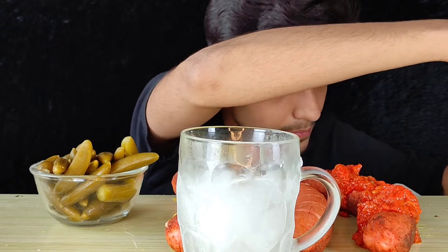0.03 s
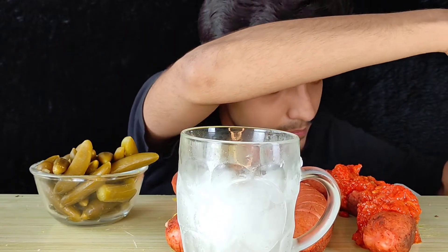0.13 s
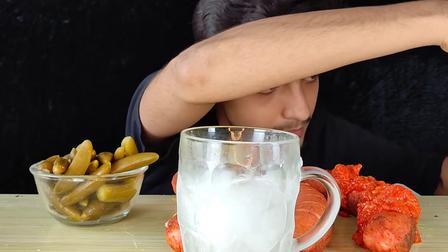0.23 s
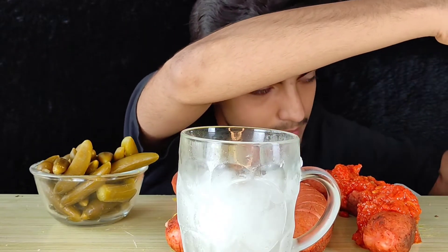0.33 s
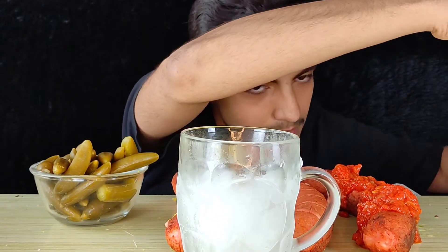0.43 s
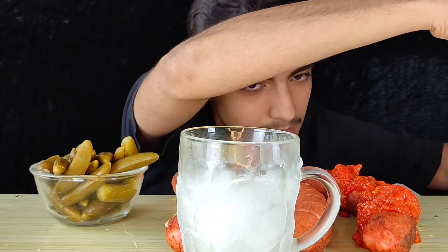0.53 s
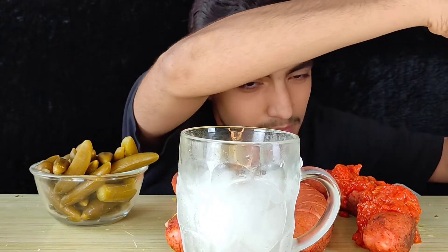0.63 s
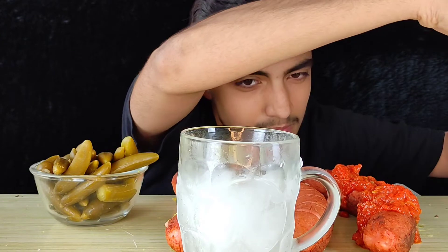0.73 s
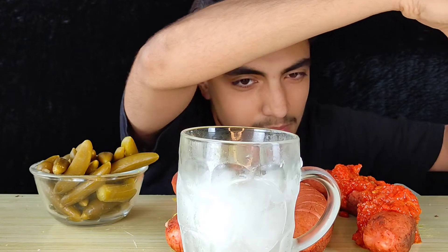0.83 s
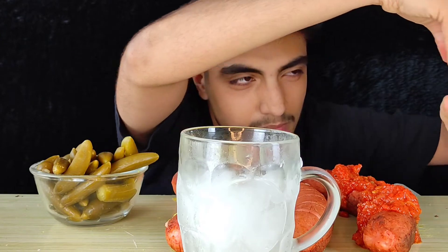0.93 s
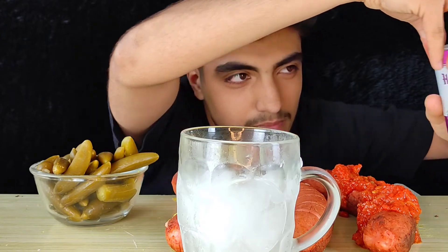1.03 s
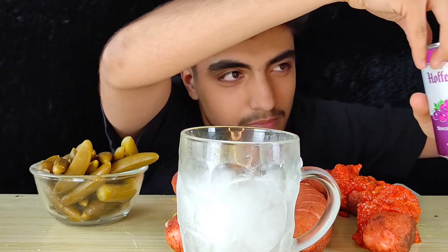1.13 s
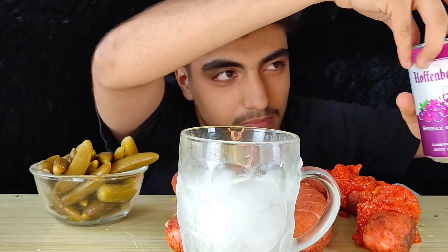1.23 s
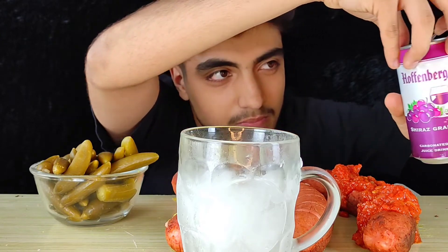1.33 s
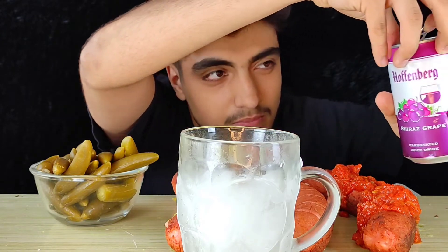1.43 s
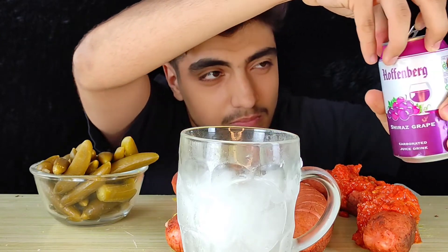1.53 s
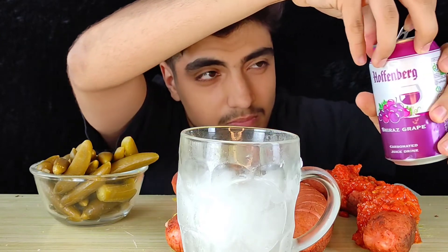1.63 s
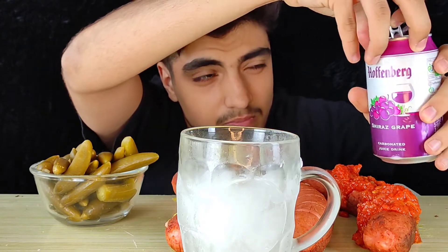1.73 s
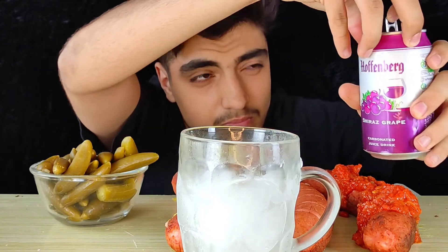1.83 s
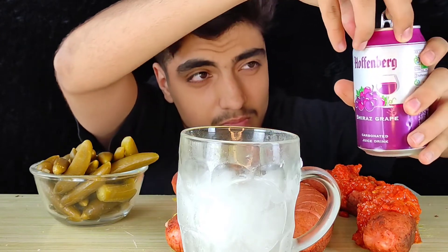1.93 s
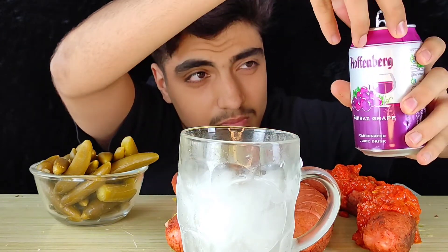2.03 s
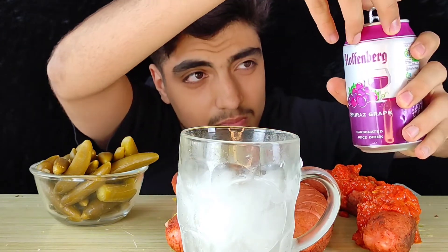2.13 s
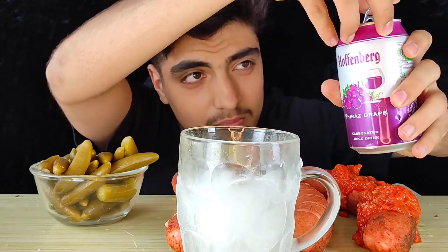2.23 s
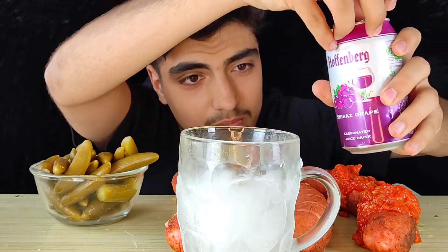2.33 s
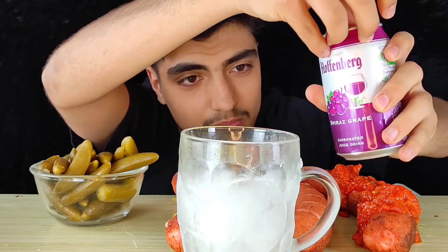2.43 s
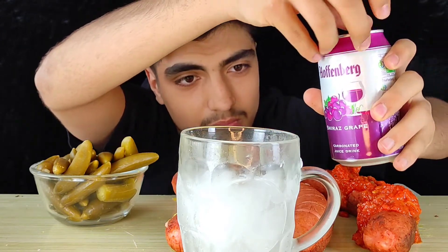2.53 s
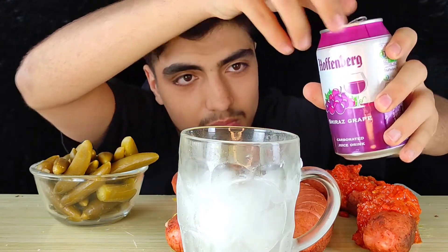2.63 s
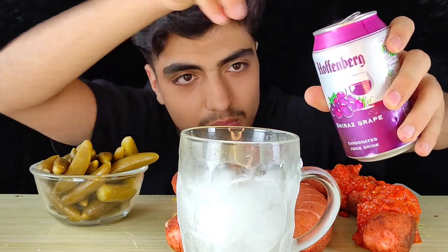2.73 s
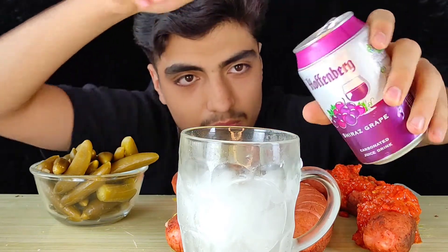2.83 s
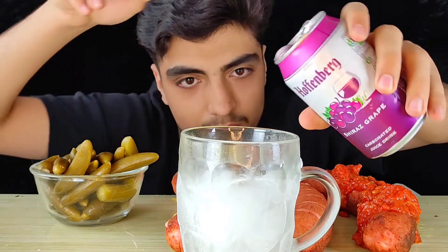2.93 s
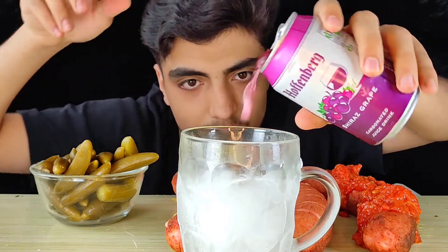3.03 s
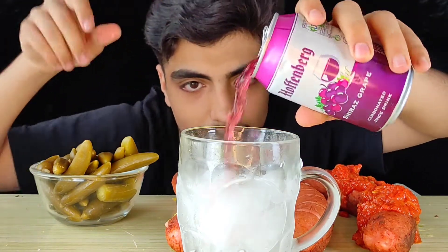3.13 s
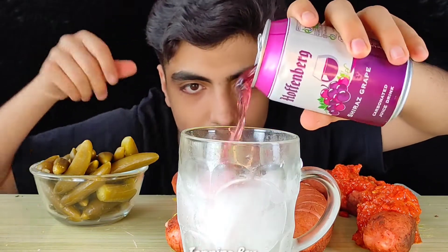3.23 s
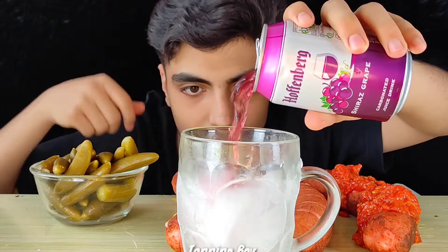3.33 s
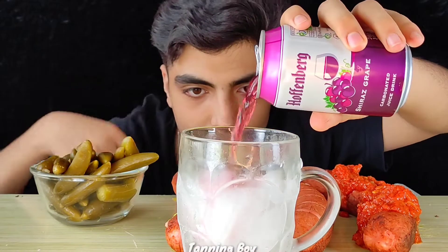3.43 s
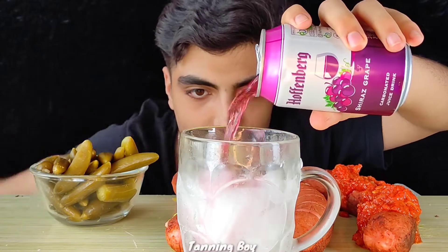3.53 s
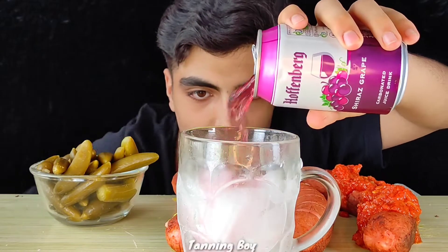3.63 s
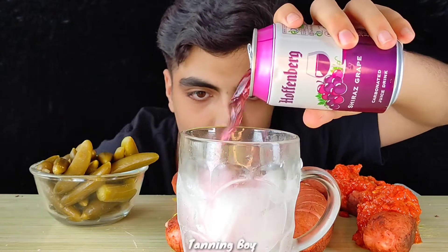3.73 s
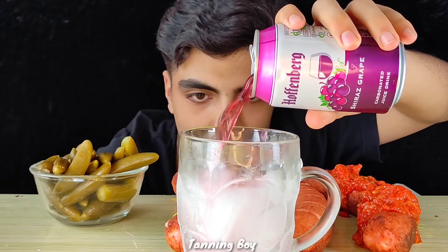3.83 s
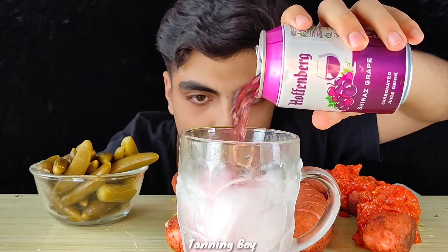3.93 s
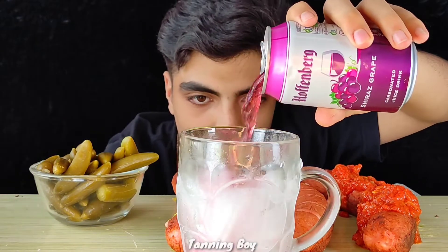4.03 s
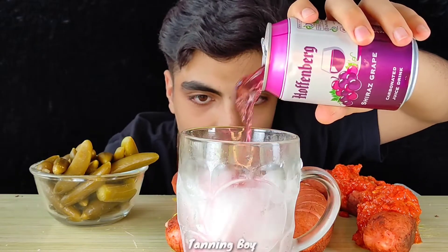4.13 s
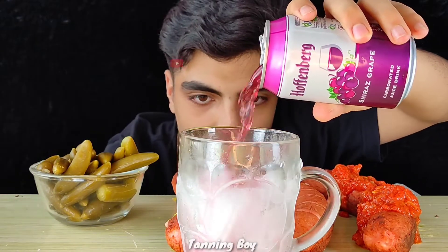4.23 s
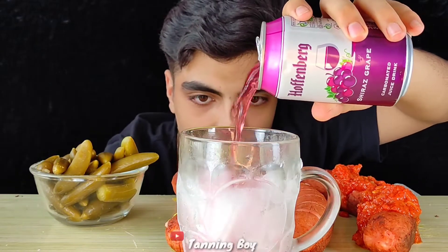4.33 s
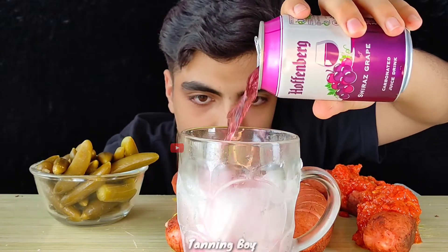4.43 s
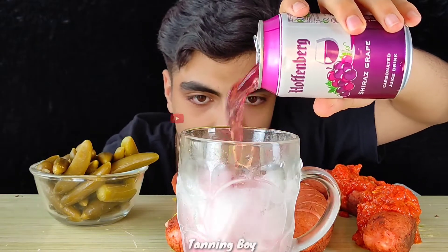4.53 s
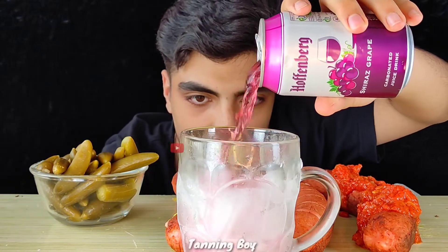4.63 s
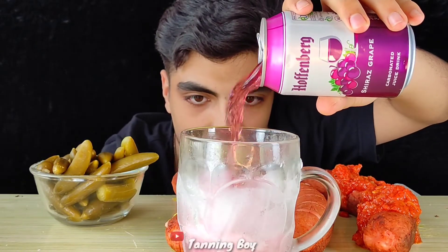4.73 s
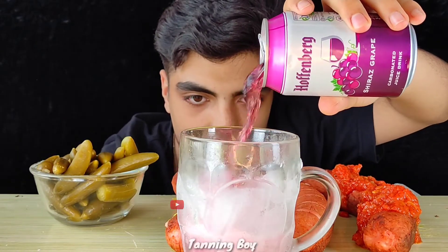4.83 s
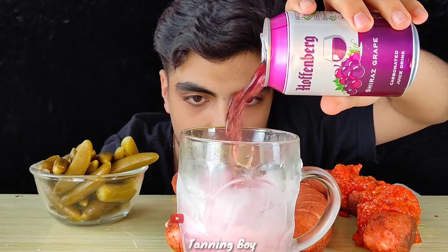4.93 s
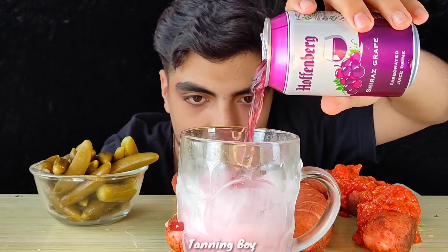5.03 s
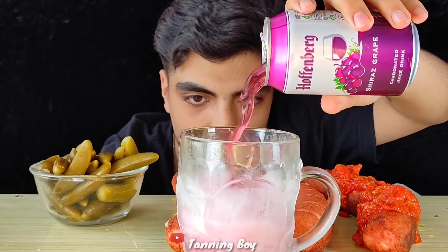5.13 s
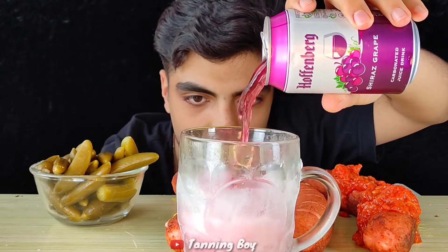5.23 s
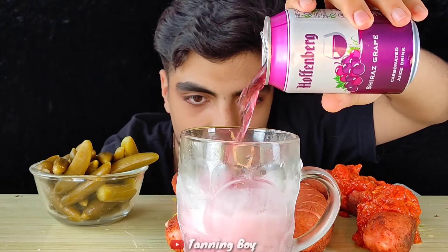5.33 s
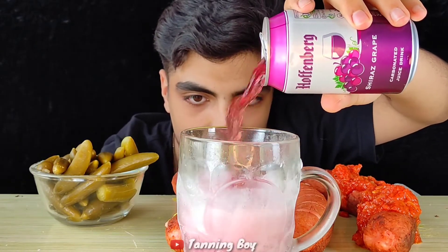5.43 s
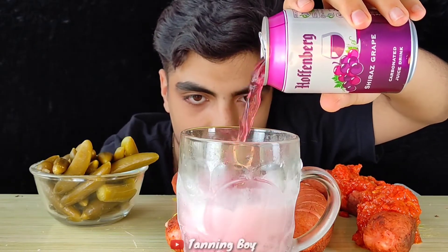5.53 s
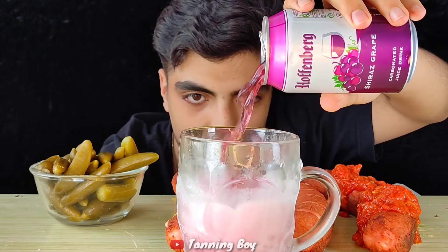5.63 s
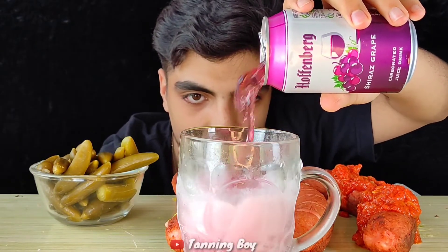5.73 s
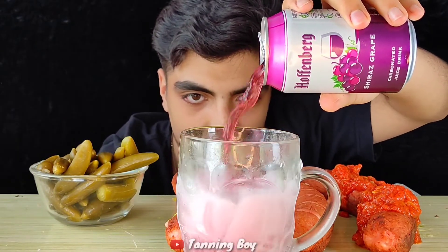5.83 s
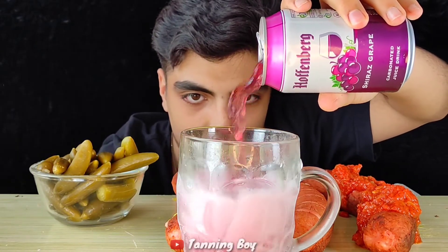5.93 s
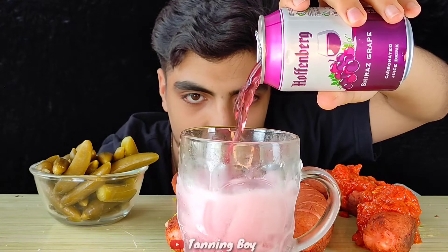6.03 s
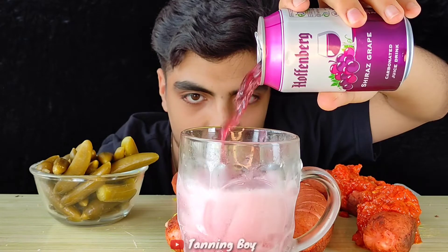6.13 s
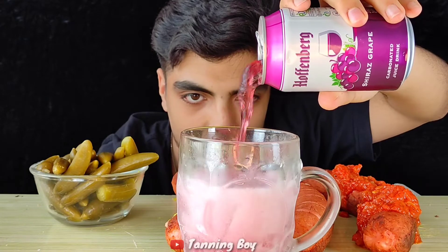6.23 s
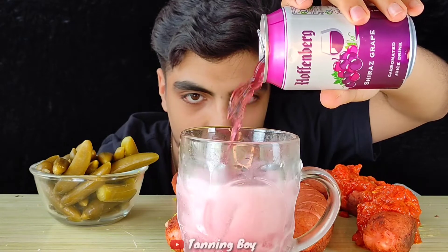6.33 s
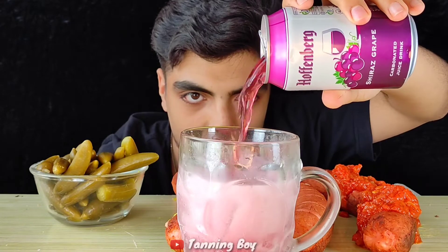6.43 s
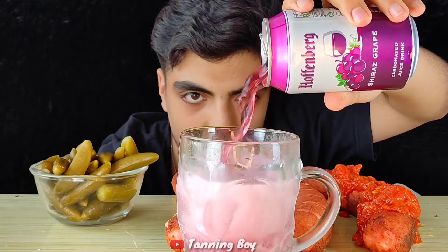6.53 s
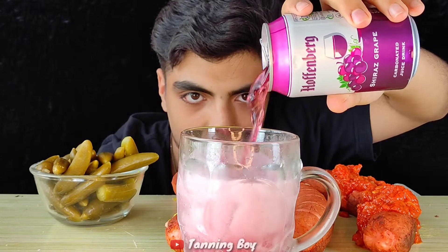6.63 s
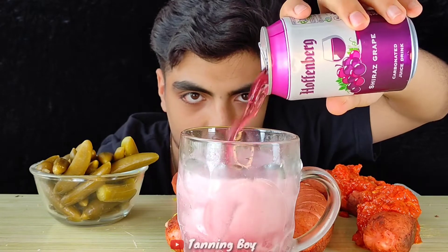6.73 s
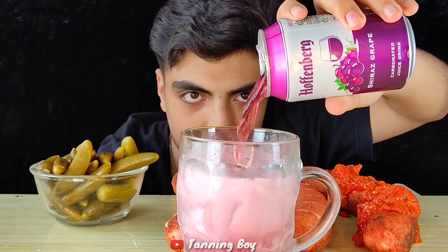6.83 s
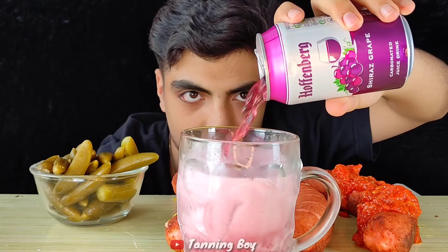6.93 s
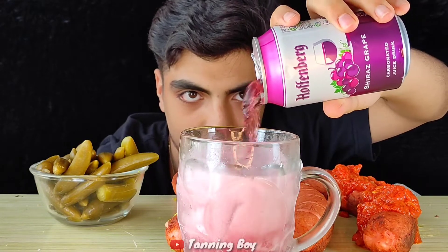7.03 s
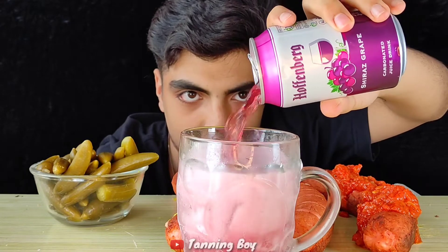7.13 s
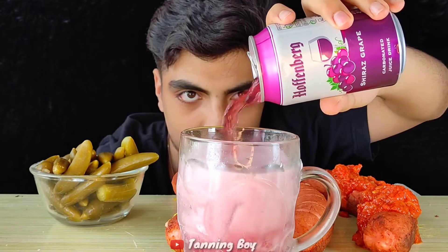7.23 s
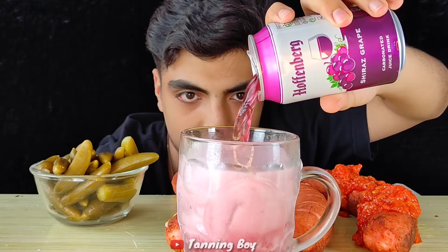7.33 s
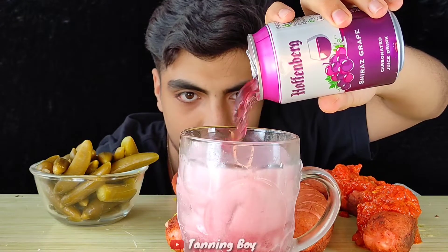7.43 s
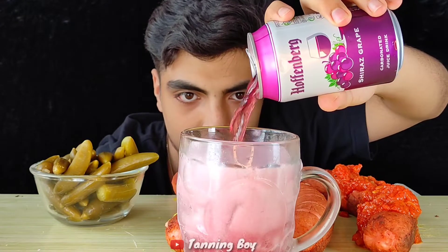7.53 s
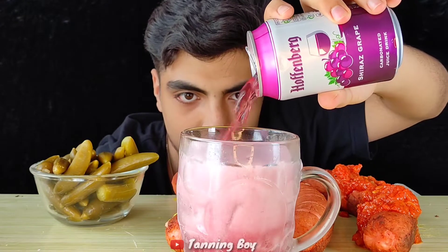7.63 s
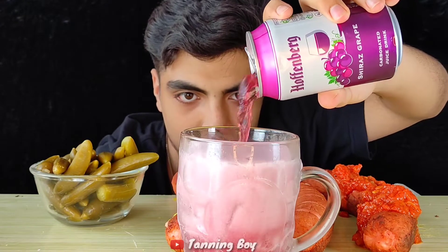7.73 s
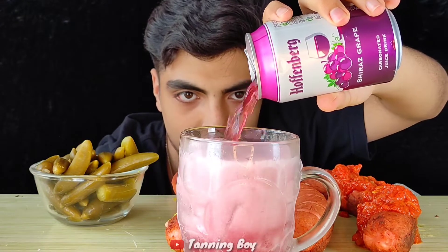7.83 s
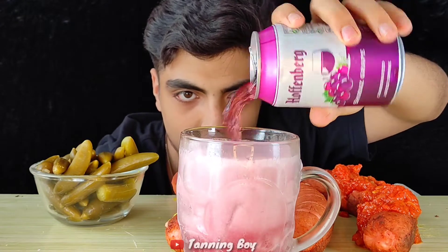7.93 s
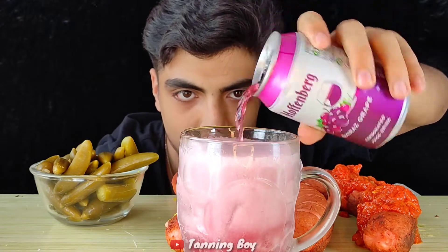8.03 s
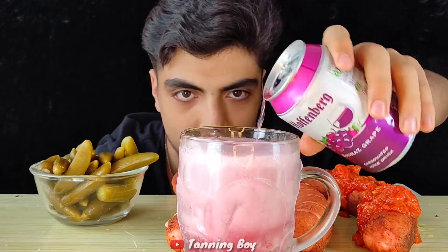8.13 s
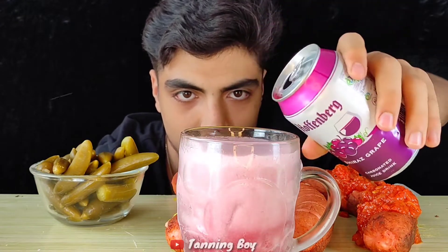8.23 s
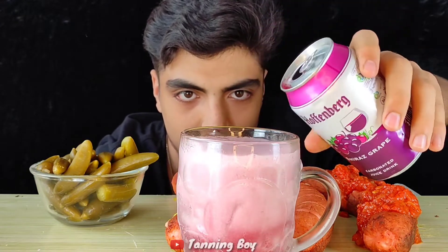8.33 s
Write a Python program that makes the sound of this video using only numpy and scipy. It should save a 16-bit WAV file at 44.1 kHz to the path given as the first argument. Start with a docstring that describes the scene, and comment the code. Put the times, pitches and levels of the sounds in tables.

```python
"""A small room: a can of fizzy drink is opened close to a microphone and poured over ice in a glass mug.
Gas, tab and lid are shaped noise and bursts: gas spits out, the tab snaps, the lid tears.
The pour sums damped bubble tones, a resonance in the shrinking air space and fizzing foam.
The ice cracks and bumps as coloured bursts; decaying modes make its knock and its clinks on the glass."""
import sys
import numpy as np
from scipy import signal
from scipy.fft import rfft, irfft, next_fast_len
from scipy.io import wavfile
from scipy.ndimage import map_coordinates

SR = 44100
rng = np.random.default_rng(int(sys.argv[2]) if len(sys.argv) > 2 else 0)


def transcribe(u):
    """Save the signal u as a 16-bit wav file named by the first command-line argument.

    u: samples, shape (n,) or (channels, n), limited to [-1, 1]; the rate is SR.
    q: integer samples, one column per channel.
    """
    v = np.clip(np.atleast_2d(u).T, -1, 1)
    q = np.round(v * 32767).astype(np.int16)
    wavfile.write(sys.argv[1], SR, q)


N = 369425
TIME_S = np.arange(N) / SR
HIT_S = np.arange(SR // 2) / SR  # time axis of one short sound


def amp(db):
    """Decibels to gain."""
    return 10 ** (np.asarray(db) / 20)


def unit(x):
    """Scale to rms 1."""
    return x / np.sqrt(np.mean(x ** 2) + 1e-20)


def along(points, hz):
    """(Hz, value) points read on a log frequency axis."""
    point_hz, value = np.transpose(points)
    return np.interp(np.log(hz + 1), np.log(point_hz), value)


def curves(rows):
    """One value per sample for each column after the time."""
    s, *columns = np.transpose(rows)
    return [np.interp(TIME_S, s, column) for column in columns]


def wobble(knots_per_s):
    """Smooth random curve through normally distributed knots."""
    knots = rng.standard_normal(int(N * knots_per_s / SR) + 4)
    return map_coordinates(knots, [TIME_S * knots_per_s])


def colour(x, spectrum, size=4096):
    """Causal minimum-phase filter with the given (Hz, dB) shape, by folding the cepstrum."""
    log_gain = np.log(amp(along(spectrum, np.fft.rfftfreq(size, 1 / SR))))
    cepstrum = irfft(log_gain)
    cepstrum[1:size // 2] *= 2
    cepstrum[size // 2 + 1:] = 0
    impulse = irfft(np.exp(rfft(cepstrum)))
    return signal.fftconvolve(x, impulse)[:len(x)]


def noise(spectrum):
    """Coloured noise of rms 1."""
    return unit(colour(rng.standard_normal(N), spectrum))


def fade(t, t60):
    """Free decay, 60 dB in t60."""
    return np.exp(-np.log(1000) * t / t60)


def add(track, s, db, sound):
    """Place a sound at time s with its peak at db."""
    part = track[round(s * SR):][:len(sound)]
    part += amp(db) * sound[:len(part)] / np.abs(sound).max()


# Room decay. Each row: frequency in Hz, t60 in s.
ROOM_DECAY = [(150, 0.75), (1000, 0.41), (4000, 0.32), (8000, 0.23), (15000, 0.15)]


def room(x, wet_db):
    """The sound plus a diffuse tail whose treble dies first."""
    hz, t, z = signal.stft(rng.standard_normal(len(HIT_S)), SR, nperseg=256)
    decay = fade(t, along(ROOM_DECAY, hz)[:, None])
    tail = signal.istft(z * decay, SR, nperseg=256)[1]
    tail = np.pad(tail, (SR // 150, 0)) / np.linalg.norm(tail)  # starts 1/150 s late
    return x + amp(wet_db) * signal.fftconvolve(x, tail)[:N]


def clicks(rows, spectrum, t60):
    """Short bursts coloured by the body that snaps."""
    out = np.zeros(N)
    for s, db in rows:
        burst = rng.standard_normal(len(HIT_S)) * fade(HIT_S, t60)
        add(out, s, db, colour(burst, spectrum))
    return out


def ring(modes, scatter_db):
    """One blow on a set of modes, each at a new strength."""
    out = np.zeros(len(HIT_S))
    for hz, db, t60 in modes:
        strength = amp(db + scatter_db * rng.standard_normal())
        out += strength * fade(HIT_S, t60) * np.sin(2 * np.pi * hz * HIT_S)
    return out


def chirps(start, hz, strength, cycles, rise, size):
    """Damped bubble tones from the given samples, t60 in cycles, each rising as it nears the surface."""
    turns = np.minimum(hz, SR / 2)[:, None] * np.arange(size) / SR
    age = np.minimum(turns / cycles, 1)
    tones = strength[:, None] * fade(turns, cycles) * np.sin(2 * np.pi * turns * (1 + rise * age))
    where = start[:, None] + np.arange(size)
    return np.bincount(where.ravel(), tones.ravel(), N)[:N]


def bubbles(per_s, hz, spread_oct, cycles, size_db, rise, drift_oct, size):
    """A steady cloud of bubbles with random times, pitches and strengths; rms 1."""
    start, pitch, strength = rng.random((int(per_s * N / SR), 3)).T
    start = (start * N).astype(int)
    swarm_oct = drift_oct * wobble(20)[start]  # bubbles born together are alike in size
    strength = amp(size_db * np.minimum(-np.log(1 - strength), 4))
    bubble_hz = hz * 2 ** (swarm_oct + spread_oct * (2 * pitch - 1))
    return unit(chirps(start, bubble_hz, strength, cycles, rise, size))


# Room noise level before its wobble. Each row: time in s, rms in dB.
RUMBLE_LEVEL = [(0, -34), (.5, -39), (2.5, -41), (3.3, -37), (8.3, -36.5)]
# Room noise spectrum. Each row: frequency in Hz, relative level in dB.
RUMBLE_SPECTRUM = [(20, -3), (45, -5.5), (120, -4.5), (260, -15), (430, -22), (1000, -29.5), (1800, -38.5),
                   (8000, -69.5)]
# Low drone before its wobble. Each row: frequency in Hz, amplitude in dB.
DRONE_TONES = [(72, -39), (192, -45), (335, -50.5)]


def background():
    """Low room rumble and a faint hiss, with a wavering drone that dies away."""
    rumble_db = curves(RUMBLE_LEVEL)[0] + 1.1 * wobble(18.0)
    rumble = amp(rumble_db) * noise(RUMBLE_SPECTRUM)
    hiss = amp(-55.5) * noise([(4000, 0.0), (14000, -4.5)])
    drone = np.zeros(N)
    for hz, db in DRONE_TONES:
        level = amp(db + 3.5 * wobble(3.5))
        drone += level * np.sin(2 * np.pi * hz * TIME_S + wobble(7.0))
    return rumble + hiss + drone * np.interp(TIME_S, [2.1, 2.5], [1, 0])


# Ice pile dropping on the bottom. Each row: start in s, peak in dB.
KNOCK_HITS = [(5.484, -8.5), (5.569, -3.5), (5.589, -27)]
# Modes of the mug on the table top. Each row: frequency in Hz, relative level in dB, t60 in s.
TABLE_MODES = [(126, -8.5, 0.28), (163.2, -3.5, 0.31), (232, -1, 0.16), (292, 8, 0.028), (437, -2, 0.045)]


def knocks():
    """Ice falls on the bottom and rings the low modes of mug and table."""
    out = np.zeros(N)
    for s, db in KNOCK_HITS:
        add(out, s, db, ring(TABLE_MODES, scatter_db=0.5))
    return room(out, wet_db=-5.5)


# Ice splitting in the drink. Each row: start in s, peak in dB.
CRACK_HITS = [(3.576, -12), (4.133, -25), (4.566, -22.5), (4.785, -23.5), (4.903, -23), (5.129, -10.5)]
# Crack spectrum. Each row: frequency in Hz, relative level in dB.
CRACK_SPECTRUM = [(200, 6), (730, -7), (2560, 6), (4500, -10), (10000, -6), (15500, -17.5)]
# Submerged ice bumping the wall. Each row: start in s, peak in dB.
BUMP_HITS = [(5.569, -4.5), (5.843, -23.5), (6.033, -21.5), (6.487, -22.5), (6.746, -24.5), (6.785, -18),
             (6.793, -15.5), (6.906, -13), (6.94, -18), (7.051, -23), (7.132, -18.5), (7.211, -21.5),
             (7.338, -19), (7.426, -16.5), (7.533, -22.5), (7.601, -28), (7.71, -24), (7.825, -27),
             (7.908, -26.5)]
# Bump spectrum. Each row: frequency in Hz, relative level in dB.
BUMP_SPECTRUM = [(100, 3.5), (280, 6), (750, 0.5), (1300, -1), (2400, -4.5), (3500, -18), (14000, -28.5)]


def ice():
    """Cubes split, then bump about afloat: short coloured bursts."""
    cracks = clicks(CRACK_HITS, CRACK_SPECTRUM, t60=0.011)
    bumps = clicks(BUMP_HITS, BUMP_SPECTRUM, t60=0.0087)
    return room(cracks + bumps, wet_db=-4.5)


# Ice striking bare glass. Each row: start in s, peak in dB, main mode in Hz, second mode in Hz.
CLINK_HITS = [(5.485, 1, 10340, 4210), (5.57, -8, 7020, 9080), (5.599, -10.5, 4870, 2030),
              (6.489, -18, 9080, 5600), (6.908, -12.5, 7020, 5600), (6.94, -22, 5600, 9080),
              (7.058, -23, 5600, 7020), (7.133, -30, 9080, 7020), (7.177, -29.5, 5600, 2030),
              (7.34, -17.5, 4870, 2030), (7.71, -27.5, 2030, 4870)]
# Modes of the mug, before strike and damping. Each row: frequency in Hz, relative level in dB, t60 in s.
GLASS_MODES = [(2015, 4.5, 0.052), (4217, -4.5, 0.17), (4870, 2, 0.054), (5590, -6.5, 0.11),
               (7036, -6, 0.16), (9080, 4.5, 0.03), (9600, -0.5, 0.15), (10270, 5, 0.1), (12220, -7, 0.1),
               (14200, -3.5, 0.14)]
SECOND_DB, OTHERS_DB = -5.5, -15.5  # drive of the second mode and the rest, against the main one


def clinks():
    """The spot where the ice strikes picks out two modes of the glass; the others ring faintly."""
    out = np.zeros(N)
    hz, level_db, t60 = np.transpose(GLASS_MODES)
    for s, db, main_hz, second_hz in CLINK_HITS:
        drive_db = np.full(len(hz), OTHERS_DB)
        drive_db[np.argmin(np.abs(hz - second_hz))] = SECOND_DB
        drive_db[np.argmin(np.abs(hz - main_hz))] = 0
        contact = .5 * rng.standard_normal(len(HIT_S)) * fade(HIT_S, 0.005)
        glass = ring(zip(hz, level_db + drive_db, t60), scatter_db=2)
        add(out, s, db, glass * (fade(HIT_S, 0.043) + .5) + contact)
    return room(out, wet_db=-9.0)


# Single large bubbles. Each row: start in s, peak in dB, initial frequency in Hz, t60 in s.
PLOP_HITS = [(.505, -26.5, 516, 0.019), (1.962, -24.5, 900, 0.029), (2.195, -28, 954, 0.011),
             (3.913, -22, 750, 0.036), (4.113, -22.5, 853, 0.03), (8.201, -23, 454, 0.11)]


def plops():
    """Large single bubbles in the can and the mug: softly started tones that rise slightly."""
    out = np.zeros(N)
    for s, db, hz, t60 in PLOP_HITS:
        tone = np.sin(2 * np.pi * hz * HIT_S * (1 + 0.021 * np.minimum(HIT_S / t60, 1)))
        add(out, s, db, tone * fade(HIT_S, t60) * (1 - fade(HIT_S, .008)))
    return room(out, wet_db=-7.5)


# Tab and lid snapping. Each row: start in s, peak in dB.
SNAP_HITS = [(.583, 11.5), (1.423, -12.5), (1.4305, 4), (1.754, -7.5), (1.76, 19.5)]
# Snap spectrum. Each row: frequency in Hz, relative level in dB.
TAB_SPECTRUM = [(150, -18.5), (800, -18), (2200, -11), (3500, -9), (4300, 2.5), (5100, -9.5), (6900, -3.5),
                (15500, -16)]
# Fingernail picking at the tab. Each row: start in s, peak in dB.
TICK_HITS = [(.17, -35), (.452, -37), (.953, -32), (1.232, -31.5), (1.63, -35), (1.661, -27.5)]
# Nail spectrum. Each row: frequency in Hz, relative level in dB.
NAIL_SPECTRUM = [(1500, -15), (3000, -10.5), (4300, 0), (6500, -18.5), (12000, -32)]
# Gas through the first slit. Each row: time in s, rms in dB.
JET_LEVEL = [(.579, -100), (.585, -8), (.595, 5.5), (.62, -4.5), (.628, -20.5), (.68, -39), (.8, -100)]
# Jet spectrum. Each row: frequency in Hz, relative level in dB.
JET_SPECTRUM = [(200, -10.5), (1200, -18.5), (2200, -9), (3000, -9.5), (6300, -8), (9000, 1.5),
                (14200, -3.5), (15500, -15.5)]
# Last gas seeping out. Each row: time in s, rms in dB.
LEAK_LEVEL = [(.58, -100), (.66, -41), (.97, -47), (1.25, -100)]
# Leak spectrum. Each row: frequency in Hz, relative level in dB.
LEAK_SPECTRUM = [(3100, -1.5), (3500, 4.5), (3950, -4.5), (6200, -7), (7400, 5.5), (9500, -4.5),
                 (12500, -13.5)]
# Lid creaking, then tearing along its score. Each row: time in s, rms in dB.
TEAR_LEVEL = [(1.74, -68.5), (1.744, -19), (1.758, -20.5), (1.761, -1.5), (1.782, -0.5), (1.795, -8.5),
              (1.82, -12.5), (1.84, -27.5), (1.93, -100)]
# Lid spectrum. Each row: frequency in Hz, relative level in dB.
LID_SPECTRUM = [(300, -32), (650, -12.5), (950, 1), (1350, -5), (1800, -3), (2900, -13.5), (3700, 3),
                (5600, -9.5), (8800, -9.5), (15500, -28.5)]
# Foam inside the open can, heard while it is upright. Each row: time in s, rms in dB.
FOAM_LEVEL = [(1.7, -92.5), (1.95, -60.5), (2.85, -55.5), (3.8, -62.5), (7.8, -62), (8.2, -56.5)]


def can():
    """A nail picks, the tab snaps, gas bursts out and seeps on, the lid rips in tiny fractures."""
    snaps = clicks(SNAP_HITS, TAB_SPECTRUM, t60=0.02) + clicks(TICK_HITS, NAIL_SPECTRUM, t60=.02)
    puff = clicks([(.583, -4), (1.76, -23.5)], [(60, -7.5), (160, -3.5), (900, -35.5)], t60=0.025)
    jet = amp(curves(JET_LEVEL)[0]) * noise(JET_SPECTRUM)
    leak = amp(curves(LEAK_LEVEL)[0]) * noise(LEAK_SPECTRUM)
    fractures = rng.standard_normal(N) * (rng.random(N) < .15)  # sparse impulses
    lid = amp(curves(TEAR_LEVEL)[0]) * unit(colour(fractures, LID_SPECTRUM))
    foam_noise = noise([(5000, -14.0), (8000, 3.5), (11200, -2.5), (12500, -17.5)])
    foam = amp(curves(FOAM_LEVEL)[0]) * foam_noise
    return room(snaps, wet_db=-8.0) + room(jet + leak + puff, wet_db=-12.0) + room(lid, wet_db=-5.5) + foam


# Stream strength as the can is tipped, before layer offsets. Each row: time in s, level in dB.
FLOW_LEVEL = [(3.1, -84.5), (3.18, -50.5), (4.2, -50.5), (4.9, -48), (6.05, -47), (6.62, -54.5),
              (6.95, -49.5), (7.5, -55.5), (8.1, -52.5), (8.35, -56.5)]
# The can gulps air and the stream swells. Each row: start in s, lift in dB (fizz and splash take less).
GLUG_LIFTS = [(3.509, 16), (3.86, 6.5), (4.07, 5), (4.32, 6.5), (4.82, 0.5), (5.68, 7), (6.38, 7.5)]
GLUG_ATTACK_S, GLUG_RELEASE_S = 0.038, 0.17
POOL_S, SHALLOW_DB_PER_S = 3.77, 10  # before a pool forms: spatter on bare ice, more hum, less gurgle
HEAD_S, MUFFLE_DB_PER_S = 6.73, 6.5  # from here the head of foam muffles gurgle and hum


def stream():
    """Levels of gurgle, hollow hum, splash and fizz in dB: all follow the flow and swell at each glug."""
    flow_db, = curves(FLOW_LEVEL)
    glug_s = [0, GLUG_ATTACK_S, GLUG_ATTACK_S + GLUG_RELEASE_S]
    swell_db = sum(np.interp(TIME_S - s, glug_s, [0, db, 0]) for s, db in GLUG_LIFTS)
    shallow_db = SHALLOW_DB_PER_S * np.maximum(POOL_S - TIME_S, 0)
    muffle_db = MUFFLE_DB_PER_S * np.maximum(TIME_S - HEAD_S, 0)
    plunge_db = flow_db + swell_db - muffle_db
    fizz_db = flow_db + 0.44 * swell_db
    return plunge_db - shallow_db, plunge_db + shallow_db, fizz_db + shallow_db / 2, fizz_db


# Like-sized bubbles where the stream surges. Each row: start in s, peak in dB, centre frequency in Hz.
SWARM_RUNS = [(3.283, -32, 2930), (3.383, -28.5, 3150), (3.9, -30, 4970), (4.39, -33, 1370),
              (4.128, -29, 5760), (4.303, -33, 3380), (4.359, -27.5, 9600), (4.59, -26, 890),
              (4.66, -23, 7900), (4.699, -30, 5470), (4.83, -25.5, 2520), (6.04, -27.5, 2420)]
SWARM_S, SWARM_SPREAD_OCT = .065, 0.19  # span of bubble starts, pitch range either way


def swarms(count=22):
    """Quick runs of like-sized bubbles, the first ones tending to be strongest."""
    out = np.zeros(N)
    for s, db, hz in SWARM_RUNS:
        when, pitch, strength = rng.random((3, count))
        start = ((s + SWARM_S * when) * SR).astype(int)
        bubble_hz = hz * 2 ** (SWARM_SPREAD_OCT * (2 * pitch - 1))
        strength = strength ** 2 * (1 - when / 2)
        add(out, 0, db, chirps(start, bubble_hz, strength, cycles=27, rise=0.077, size=900))
    return out


# Air resonance above the rising drink. Each row: time in s, frequency in Hz.
AIR_PITCH = [(3.55, 741), (4.2, 894), (5.4, 1133), (8, 1352)]


def air_space(x, width_hz):
    """The air column in the mug: one resonance that climbs as the mug fills; rms 1."""
    turn = np.exp(2j * np.pi * np.cumsum(curves(AIR_PITCH)[0]) / SR)
    pole = np.exp(-np.pi * width_hz / SR)
    # shift the resonance to 0 Hz, low-pass, shift back
    return unit((turn * signal.lfilter([1], [1, -pole], x / turn)).real)


# Splash spectrum. Each row: frequency in Hz, relative level in dB.
SPLASH_SPECTRUM = [(900, -13), (1800, -16), (2500, -1), (3100, -2.5), (4000, -8), (7000, -23.5)]
# Fizz spectrum. Each row: frequency in Hz, relative level in dB.
FIZZ_SPECTRUM = [(2000, -29.5), (4500, -3), (6300, -7), (8500, 0.5), (10700, -1), (12000, -8.5),
                 (15500, -6)]


def pour():
    """The stream drives in large bubbles, hums in the air space, spatters small bubbles and frees gas."""
    gurgle_db, hollow_db, splash_db, fizz_db = stream()
    surge = wobble(22)  # the stream lands unevenly
    large = bubbles(per_s=140, hz=980, spread_oct=0.85, cycles=6.5, size_db=3.8,
                    rise=0.07, drift_oct=0, size=700)
    ringing = unit(air_space(large, width_hz=220) + large)
    gurgle = amp(gurgle_db + 0.5 + 3.9 * surge) * ringing
    column = air_space(rng.standard_normal(N), width_hz=120)
    hollow = amp(hollow_db - 6.5 + 3 * surge) * column
    small = bubbles(per_s=380, hz=2500, spread_oct=0.75, cycles=21, size_db=4.6,
                    rise=.08, drift_oct=0.14, size=700)
    splash = amp(splash_db - 2.5 + 2 * surge) * unit(colour(small, SPLASH_SPECTRUM))
    tiny = bubbles(per_s=2400, hz=8580, spread_oct=.9, cycles=51, size_db=3.5,
                   rise=.03, drift_oct=0.22, size=260)
    fizz = amp(fizz_db - 1.5 + 1.8 * surge) * unit(colour(tiny, FIZZ_SPECTRUM))
    return room(gurgle + hollow + splash + fizz + swarms(), wet_db=-6.0)


def scene():
    """Can, drink and ice before one microphone."""
    return (background() + knocks() + ice() + clinks() + plops() + can() + pour())[None]


TOP_HZ = 15500


def record(dry):
    """The loudest peaks overload the input softly; a steep low-pass sets the band limit."""
    clipped = dry / (1 + np.abs(dry) ** 8) ** (1 / 8)
    m = next_fast_len(N + SR // 2)
    passband = 1 / (1 + (np.fft.rfftfreq(m, 1 / SR) / TOP_HZ) ** 150)
    return irfft(rfft(clipped, m) * passband, m)[..., :N]


dry = scene()
out = record(dry)
transcribe(out)
```